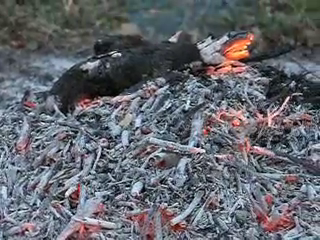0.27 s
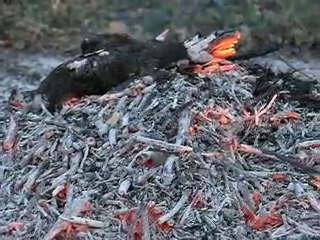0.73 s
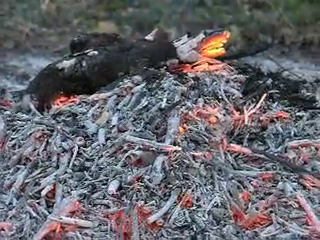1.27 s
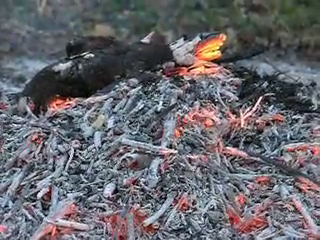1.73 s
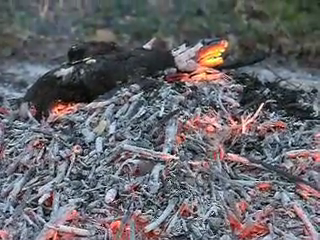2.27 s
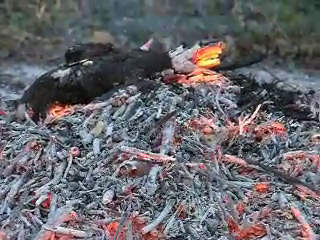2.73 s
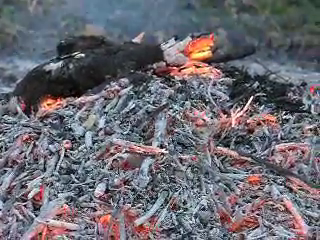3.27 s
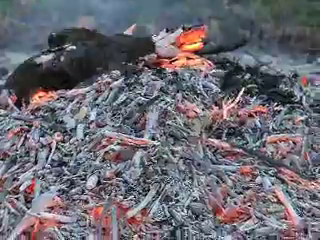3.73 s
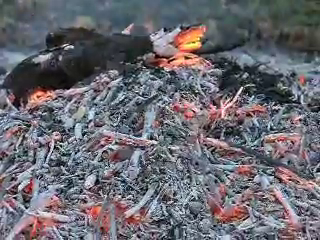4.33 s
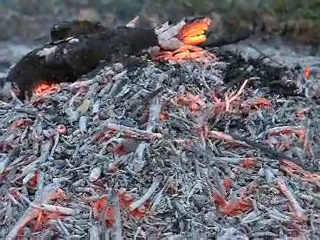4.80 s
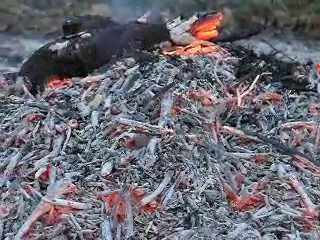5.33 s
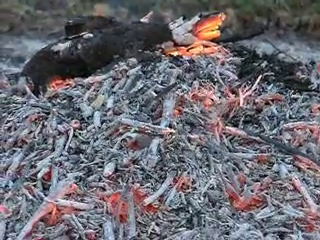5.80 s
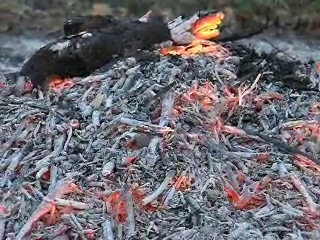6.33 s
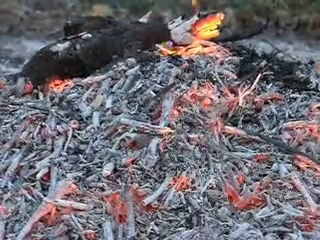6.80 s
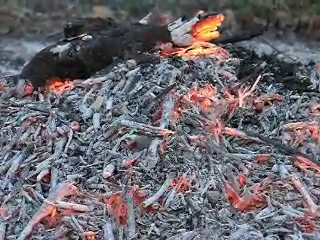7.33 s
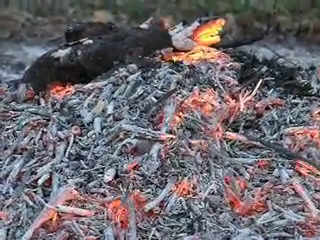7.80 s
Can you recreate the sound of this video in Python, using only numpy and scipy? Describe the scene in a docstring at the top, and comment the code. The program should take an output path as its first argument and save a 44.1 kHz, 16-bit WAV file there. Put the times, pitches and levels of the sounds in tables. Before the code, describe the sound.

A blackbird sings outdoors in short phrases: rich low whistles, pulsing trills and scratchy twitters, sometimes two notes at once, with fainter high chirps between and a soft garden echo. Close embers tick sparsely, mostly late, and one violent crack around six seconds overloads the small camera microphone. Steady muffled hiss and low rumble lie beneath.

```python
"""A blackbird whistles and trills in a garden, often with both halves of its voice at once, and fainter
chirps come between: each note is a nearly pure tone whose pitch and loudness bend or swing.
Bonfire embers tick close by, sharp breaks that ring the char and push the air; one pop overloads
a small narrow-band camera. Shaped noise makes the steady hiss, distant rumble and two faint hums underneath."""
import sys
import numpy as np
from scipy import signal
from scipy.fft import rfft, irfft, next_fast_len
from scipy.io import wavfile
from scipy.ndimage import uniform_filter1d, map_coordinates

SR = 44100
rng = np.random.default_rng(int(sys.argv[2]) if len(sys.argv) > 2 else 0)


def wrap_up_sound(samples):
    """Save the sound to the file named by the first command line argument, as 16-bit audio."""
    columns = np.atleast_2d(samples).T
    # keep every value between -1 and 1, then stretch to whole-number steps
    tamed = np.clip(columns, -1, 1)
    steps = np.round(tamed * 32767).astype(np.int16)
    wavfile.write(sys.argv[1], SR, steps)


N = 355622  # length in samples

PLAIN_RASP_HZ = 7.3  # slight pitch jitter of the clear notes


def song():
    """All the bird notes together; overlapping notes sound as two voices."""
    out = np.zeros(N)
    add_short_notes(out)
    add_long_whistles(out)
    add_buzzes(out)
    add_slow_trills(out)
    return out


def add_short_notes(out):
    """Short clear notes, each with one pitch bend and one swell."""
    # short clear notes: start_s, length_s, first_hz, middle_hz, last_hz, peak_db, peak_place (0-1)
    short_notes = [ (1.165, .105, 2195, 2370, 2340, -30, 0.7), (1.295, .076, 2290, 2336, 2305, -27, .45),
                   (1.892, .032, 2290, 2126, 1950, -38.5, .5), (2.033, 0.038, 2177, 2125, 2060, -39, 0.6),
                   (.985, .04, 3309, 3220, 3154, -52.5, .6), (2.047, .03, 3800, 3704, 3580, -49, .5),
                   (2.201, .022, 2420, 2740, 3060, -47, 0.3), (2.452, .075, 2086, 1713, 1594, -37, .55),
                   (2.667, .048, 2040, 2060, 2110, -38.5, 0.4), (2.723, .026, 2300, 2260, 2290, -28.5, 0.4),
                   (3.179, .05, 2350, 2820, 2994, -37, 0.7), (3.23, .032, 2425, 2283, 1960, -32.5, 0),
                   (3.365, .036, 2250, 2800, 3030, -35, .7), (3.839, 0.018, 3361, 3360, 3350, -40.5, .8),
                   (4.046, 0.029, 3956, 3380, 3080, -41.5, .75), (4.05, 0.053, 2200, 2204, 2230, -45.5, .5),
                   (4.164, .022, 3834, 3460, 3320, -40, .7), (4.182, .025, 3440, 3170, 3150, -41, .5),
                   (4.412, .064, 3900, 3736, 2960, -44.5, 0.9), (4.578, .04, 3940, 3550, 3312, -44, 0.6),
                   (5.478, .07, 1690, 1725, 1756, -27, .65), (6.09, .07, 2805, 2615, 2050, -39.5, .3),
                   (6.294, .063, 1710, 1808, 1822, -38.5, .7), (6.461, 0.085, 1872, 1907, 1703, -26, .65),
                   (6.616, 0.018, 1680, 1830, 1915, -41, .5), (7.37, .08, 2107, 2264, 2300, -46.5, .7)]
    for row in short_notes:
        add(out, row[0], whistle(*arch(*row), PLAIN_RASP_HZ))


def add_long_whistles(out):
    """Long clear whistles that glide through a drawn line of pitch and level."""
    # one list of points for each whistle: time_s, pitch_hz, level_db
    long_whistles = [
        [(1.035, 2470, -40.5), (1.058, 2529, -22), (1.075, 2310, -23.5), (1.1, 2158, -24.5), (1.15, 2123, -25),
         (1.19, 2153, -25), (1.25, 2143, -22.5), (1.272, 2102, -25), (1.284, 2020, -27.5)],
        [(6.025, 2660, -42.5), (6.045, 2629, -29.5), (6.065, 2544, -35.5), (6.11, 1849, -36),
         (6.135, 1716, -35)],
        [(6.3, 3162, -47), (6.318, 3435, -46), (6.345, 3575, -52), (6.41, 3627, -46), (6.47, 3690, -60)],
        [(6.965, 3470, -48), (6.985, 3693, -53), (7.02, 3806, -42), (7.06, 3769, -54), (7.25, 3720, -61.5)],
        [(7.008, 2014, -40), (7.035, 2048, -36.5), (7.045, 2227, -42), (7.068, 2650, -19), (7.08, 2780, -22.5),
         (7.1, 2769, -20.5), (7.16, 2758, -29), (7.195, 2733, -33)],
    ]
    for rows in long_whistles:
        t, (hz, db) = columns(rows)
        add(out, rows[0][0], whistle(t, hz, db, PLAIN_RASP_HZ))


def add_buzzes(out):
    """Hoarse notes whose pitch and loudness swing too fast to count."""
    # hoarse fast notes: start_s, length_s, first_hz, middle_hz, last_hz, peak_db, peak_place (0-1),
    # pulses_per_s, warble_hz (pitch swing each way), throb_db (dip depth), rasp_hz (pitch jitter)
    buzzes = [ (1.449, .125, 1980, 2502, 2896, -26, 1, 70, 71, 14.5, 76),
              (1.57, .1, 2880, 2790, 2692, -29, 0.1, 66, 90, 12, 90.4),
              (1.442, .04, 2600, 2780, 3020, -33.5, .3, 60, 68, 14, 85),
              (1.495, .075, 3200, 3420, 3500, -37, 0.3, 76, 60, 16.5, 92),
              (1.47, .06, 1660, 1680, 1850, -35.5, .5, 61, 60, 15, 55),
              (1.552, 0.14, 1940, 2073, 2032, -22, .66, 64, 65, 13.5, 65),
              (1.625, .11, 1773, 1720, 1640, -31, 0.5, 71, 50, 8.5, 62.4),
              (1.535, 0.097, 1526, 1590, 1400, -36.5, 0.7, 70, 60, 11, 70),
              (1.8, 0.13, 3900, 3850, 3900, -47, .4, 97, 13, 7, 40),
              (2.262, .068, 3690, 3190, 2150, -40, .8, 106, 140, 2, 150),
              (2.385, 0.06, 3300, 3350, 3400, -45, .4, 108, 170, 5, 130),
              (2.43, .042, 3400, 2800, 2400, -36.5, .55, 125, 170, 7, 130),
              (2.325, .137, 2330, 2225, 2080, -36.5, 0.1, 46, 140, 7, 119),
              (2.575, .25, 2600, 2650, 2685, -40, 0.1, 88, 200, 4, 50),
              (3.405, .432, 2960, 2950, 2900, -36.5, 0.1, 92, 45, 12.5, 44.9),
              (3.575, .272, 2433, 2417, 2378, -30.5, .82, 89, 95, 8.5, 50)]
    random_starts = rng.random((len(buzzes), 2))  # where the warble and throb begin, in cycles
    for (*shape, rate, warble_hz, throb_db, rasp_hz), starts in zip(buzzes, random_starts):
        t, hz, db = arch(*shape)
        buzz = trilled(t, hz, db, rate * t, warble_hz, throb_db, *starts, rasp_hz)
        add(out, shape[0], buzz)


def add_slow_trills(out):
    """Trills whose pulse rate eases from a first value towards a settled one."""
    # one list of points for each trill: time_s, pitch_hz, crest_level_db, trill_depth (0-1)
    trills = [
        [(0.618, 1800, -27, .4), (0.635, 2010, -30.5, 0), (0.7, 2013, -23.5, .05), (0.745, 1983, -22.5, 0),
         (0.77, 1969, -23.5, .5), (0.805, 1966, -23, .85), (0.85, 1906, -27.5, .95)],
        [(0.855, 1847, -32.5, .95), (0.9, 1796, -25, .9), (0.93, 1759, -29.5, .8), (0.98, 1673, -37, .3)],
        [(0.74, 2880, -56, 0.2), (0.79, 2980, -43.5, 0.8), (0.9, 2840, -41, 0.5), (0.945, 2550, -39.5, .8),
         (1.0, 2410, -45, .6)],
        [(2.85, 1877, -38, .05), (2.885, 1812, -30.5, .05), (2.945, 1810, -30, .95), (3.03, 1855, -29.5, .8),
         (3.08, 1885, -37, 0.5)],
        [(5.262, 1676, -36.5, 0.8), (5.3, 1960, -29.5, 1), (5.36, 2033, -23, .95), (5.378, 2095, -25.5, .1),
         (5.425, 2238, -27, .05), (5.462, 2130, -22.5, .05), (5.476, 1962, -21, 0.1)],
        [(5.68, 2265, -35, .95), (5.705, 2216, -24, .75), (5.76, 2175, -22, 0.3), (5.82, 2096, -32, .55),
         (5.88, 2190, -28, 0.6), (5.955, 2203, -30.5, .7)],
        [(5.73, 2660, -35, .95), (5.768, 2915, -32, .9), (5.8, 2760, -26, .95), (5.83, 2723, -25.5, .9),
         (5.87, 2776, -27, 0.7), (5.91, 2790, -26, 0.9), (5.955, 2480, -29.5, 0.6)],
        [(6.615, 2256, -32, 0.2), (6.68, 2210, -24.5, .85), (6.72, 2222, -21.5, .95), (6.8, 2226, -27, 0.6),
         (6.85, 2210, -26.5, .8), (6.9, 2163, -30.5, .5)],
        [(6.735, 2380, -32.5, .95), (6.76, 2390, -27, 0.9), (6.82, 2325, -27, .9), (6.895, 2296, -31.5, 0.6)],
    ]
    # one row for each trill: first_rate_per_s, settled_rate_per_s, settling_s,
    # warble_hz and throb_db at full depth, warble_start_cycles, throb_start_cycles, rasp_hz
    trill_clocks = [(37.1, 34, .2, 22, 29, 0.21, 0.39, 10), (33, 31, .2, 97, 11.5, .66, .86, 13),
                    (34.3, 34, .2, 73, 15.5, .6, .12, 22), (42.7, 20, .25, 24, 30.5, .68, .66, 11),
                    (36, 40, .05, 55, 36.5, .4, .5, 10), (69.7, 41.5, .05, 280, 8.5, .15, 0.4, 28),
                    (56.2, 33, 0.23, 95, 8, .64, 0.26, 15), (56.6, 39, .07, 165, 8, .26, .67, 19),
                    (41.5, 41, .2, 110, 3, .6, .49, 18)]
    for rows, clock in zip(trills, trill_clocks):
        first, last, settle, warble_hz, throb_db, *rest = clock
        t, (hz, db, depth) = columns(rows)
        # the changing rate, summed over time
        cycles = last * t + (first - last) * settle * (1 - np.exp(-t / settle))
        depth = np.clip(depth, 0, 1)
        trill = trilled(t, hz, db, cycles, depth * warble_hz, depth * throb_db, *rest)
        add(out, rows[0][0], trill)


def arch(s, length, first_hz, middle_hz, last_hz, peak_db, place):
    """A short note's curves: pitch bends through three values, level swells to one peak."""
    rise_db, fall_db = 11.5, 9  # how far under the peak the note begins and ends
    flatness = 2.6  # higher holds the level near its peak for longer
    t = np.arange(round(length * SR)) / SR
    u, place = t / length, np.clip(place, .05, .95)
    bend = np.polyfit([0, .5, 1], [first_hz, middle_hz, last_hz], deg=2)
    hz = np.polyval(bend, u)
    before = rise_db * np.abs(1 - u / place) ** flatness
    after = fall_db * np.abs((u - place) / (1 - place)) ** flatness
    return t, hz, peak_db - np.where(u < place, before, after)


def trilled(t, hz, db, cycles, warble_hz, throb_db, warble_at, throb_at, rasp_hz):
    """A whistle whose pitch and loudness swing with one clock."""
    dip_narrowness = 2.8  # keeps each dip shorter than its pulse
    hz = hz + warble_hz * np.cos(2 * np.pi * (cycles + warble_at))
    dip = np.abs(np.sin(np.pi * (cycles + throb_at))) ** dip_narrowness
    return whistle(t, hz, db - throb_db * dip, rasp_hz)


def whistle(t, hz, db, rasp_hz):
    """A nearly pure tone with soft ends; a hoarse voice jitters in pitch and loudness."""
    hz = hz + rasp_hz * wobble(350, size=len(t))
    gain = amp(db + 0.027 * rasp_hz * wobble(250, size=len(t)))
    ends = np.clip(np.minimum(t, t[-1] - t) / .003, 0, 1)  # 3 ms fades
    tone = np.sin(2 * np.pi * np.cumsum(hz) / SR)
    return np.sqrt(2) * gain * ends * tone  # the root makes levels rms


def embers():
    """Each crack is a sharp break with a short splutter, ringing the char and pushing the air."""
    # ember cracks: start_s, level_db (before filtering), splutter_s (time to fall 20 dB),
    # thump_db (push relative to the crack)
    cracks = [(1.851, -23.5, 0.0022, -2.5), (5.462, -20.5, 0.0014, -27.5), (6.0413, 17, .001, -17.5),
              (6.0476, -12, 0.0054, -6.5), (6.0508, -12.5, 0.0047, -12), (6.0595, -13.5, 0.0067, -12),
              (6.069, -14, .008, -14.5), (6.354, -29, 0.0032, -28), (6.399, -23, 0.0015, -26.5),
              (7.1, -15.5, 0.0028, -29.5), (7.4674, -12, 0.0017, -28)]
    # resonances of the char: centre_hz, width_hz, gain_db
    char_modes = [(1586, 370, -6.5), (2300, 300, 1.5), (3500, 1500, -11.5)]
    # low push of air: centre_hz, width_hz, gain_db
    air_modes = [(118, 120, -2.5), (360, 300, -2.5), (733, 240, 1.5)]
    snap_gain_db, push_gain_db = 30, 34  # make up for what a one-sample break loses in narrow resonances
    snaps, pushes = np.zeros(N), np.zeros(N)
    t = np.arange(SR // 50) / SR
    for s, db, length, thump_db in cracks:
        burst = .15 * rng.standard_normal(len(t)) * amp(-20 * t / length)
        burst[0] = 1  # the break itself
        add(snaps, s, amp(db + snap_gain_db) * burst)
        add(pushes, s, amp(db + thump_db + push_gain_db) * burst)
    dulled = filtered(snaps, lambda f: 1 / (1 + 1j * f / 3000) ** 2)  # a break takes a moment
    return filtered(dulled, modes(char_modes)) + filtered(pushes, modes(air_modes))


def modes(table):
    """Response of resonances that ring after a knock; neighbours have opposite signs."""
    def response(f):
        total = 0
        for k, (c, w, db) in enumerate(table):
            total = total + (-1) ** k * amp(db) * 1j * f * w / (c * c - f * f + 1j * f * w)
        return total
    return response


def garden(x, level_db):
    """Diffuse echo of hedges and walls: fading noise, with a new tail for every third of a second."""
    # how long the echo takes to fall 60 dB: pitch_hz, fade_s
    fade_times = [(300, 0.095), (1000, 0.26), (2200, 0.41), (2800, 0.39), (4000, 0.34)]
    out, step = np.zeros(N + SR), SR // 3
    for i in range(0, N, step):
        hz, t, z = signal.stft(rng.standard_normal(SR // 2), SR, nperseg=256)
        fade = amp(-60 * t / along(fade_times, hz)[:, None])
        tail = signal.istft(z * fade, SR, nperseg=256)[1]
        wet = signal.fftconvolve(x[i:i + step], tail / np.linalg.norm(tail))
        out[i + 300:][:len(wet)] += wet  # the echo starts 300 samples late
    return amp(level_db) * out[:N]


def background():
    """Everything steady: hiss and rumble plus the hums."""
    return hiss_and_rumble() + hums()


def hiss_and_rumble():
    """Noise with a fixed tone colour and faint patches that vary in pitch and time."""
    # colour of the noise, relative levels: pitch_hz, level_db (per Hz)
    noise_colour = [(15, -42), (25, -4.5), (33, -23), (43, -17), (77, -12), (151, -9), (187, -6.5),
                    (236, -3.5), (324, -3.5), (561, -10.5), (800, -3), (993, -6.5), (2000, -13),
                    (2220, -16.5), (3300, -22.5), (4030, -22.5), (4100, -120)]
    hiss_db = -37.5  # overall rms level
    z = signal.stft(rng.standard_normal(N + 512), nperseg=512)[2]
    across_pitch = uniform_filter1d(rng.standard_normal(z.shape), 6, 0)
    patches = uniform_filter1d(across_pitch, 14, 1)  # smoothed in time too
    noise = signal.istft(z * amp(0.72 * unit(patches)), nperseg=512)[1][:N]
    return amp(hiss_db) * unit(filtered(noise, lambda f: amp(along(noise_colour, f))))


def hums():
    """Two narrow bands of noise, heard as wavering hums."""
    # wavering hums: centre_hz, width_hz (from the centre to 1/e)
    hum_bands = [(187.3, 20), (320.8, 19)]
    # slow level changes: time_s, lower_hum_db, upper_hum_db
    hum_levels = [(0, -50.5, -52.5), (.6, -54, -45), (1.6, -49, -50.5), (2.4, -55.5, -43.5),
                  (3, -56.5, -50.5), (4.1, -57, -51.5), (4.9, -48.5, -51), (5.5, -52.5, -51.5),
                  (8.06, -56, -49)]
    s, *levels = np.transpose(hum_levels)
    out = np.zeros(N)
    for (hz, width), db in zip(hum_bands, levels):
        gain = amp(np.interp(np.arange(N) / SR, s, db))
        band = filtered(rng.standard_normal(N), lambda f: np.exp(-((f - hz) / width) ** 2))
        out = out + gain * unit(band)
    return out


def amp(db):
    """Gain of a dB value."""
    return 10 ** (np.asarray(db) / 20)


def unit(x):
    """x scaled to an rms of 1."""
    return x / np.sqrt(np.mean(x ** 2) + 1e-20)


def along(points, hz):
    """Reads a curve of (Hz, value) points on a log pitch axis."""
    f, v = np.transpose(points)
    return np.interp(np.log(hz + 1), np.log(f + 1), v)


def wobble(rate, size):
    """A smooth random curve through a given rate of random points a second."""
    points = rng.standard_normal(int(size * rate / SR) + 4)
    return map_coordinates(points, [np.arange(size) * rate / SR])


def filtered(x, response):
    """x shaped by a response of frequency, with silence padded on for the ringing."""
    m = next_fast_len(len(x) + SR // 4)
    return irfft(rfft(x, m) * response(np.fft.rfftfreq(m, 1 / SR)), m)[:len(x)]


def edge(f, top_hz, width):
    """A steep but rounded low-pass that closes at top_hz."""
    return np.sin(np.pi / 2 * np.clip((top_hz - f) / width, 0, 1)) ** 2


def add(out, s, sound):
    """Mixes a sound in at time s."""
    out[round(s * SR):][:len(sound)] += sound


def columns(rows):
    """Time from the note's start, and each column drawn out sample by sample."""
    s, *cols = np.transpose(rows)
    t = np.arange(round((s[-1] - s[0]) * SR)) / SR
    return t, [np.interp(t + s[0], s, c) for c in cols]


def scene():
    """Birds with a strong garden echo, near embers with less of it, steady background."""
    birds, fire = song(), embers()
    echo = garden(birds, level_db=-8) + garden(fire, level_db=-23)
    return (birds + fire + echo + background())[None]


def record(dry):
    """The camera overloads, loses deep bass and treble, leaks a mirrored top and clips off-centre."""
    converter_hz = 7875  # slow sampling rate: only pitches up to about half of it get in
    top_hz, output_top_hz = 4570, 16500  # where the smoothing and the final filter close
    offset = .0384  # constant shift of the wave, full scale = 1
    x = dry[0] / (1 + np.abs(dry[0] / 1.0) ** 4) ** 0.29  # saturating input
    # low-pass near half the converter rate, and bass thinned below 70 Hz
    x = filtered(x, lambda f: edge(f, converter_hz / 2 + 90, 180) * 1j * f / (70 + 1j * f))
    # mirror images around the converter rate; a little passes the smoothing filter
    mirrored = x * (1 + 2 * np.cos(2 * np.pi * converter_hz * np.arange(N) / SR))
    x = filtered(mirrored, lambda f: edge(f, top_hz, 1312) ** 1.32)
    x = np.clip(x + offset, -1, 1)
    return filtered(x, lambda f: edge(f, output_top_hz, 1530))[None]


dry = scene()
out = record(dry)
wrap_up_sound(out)
```